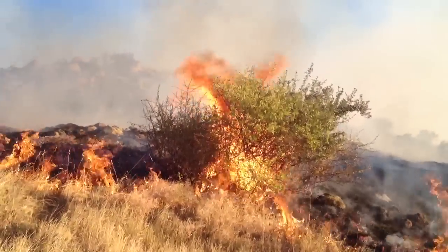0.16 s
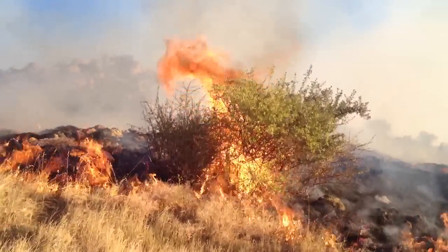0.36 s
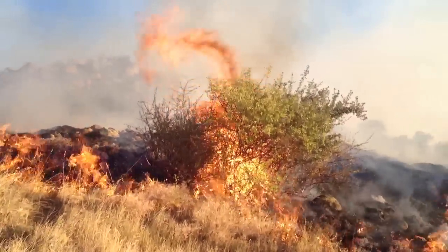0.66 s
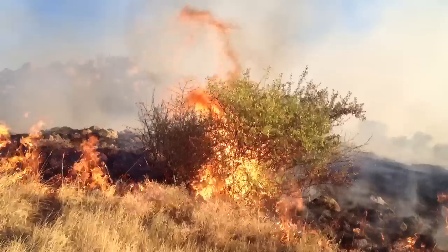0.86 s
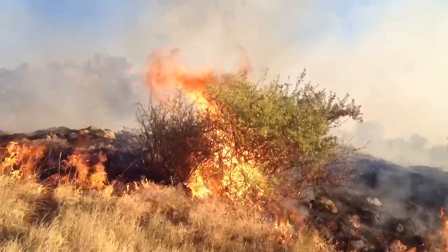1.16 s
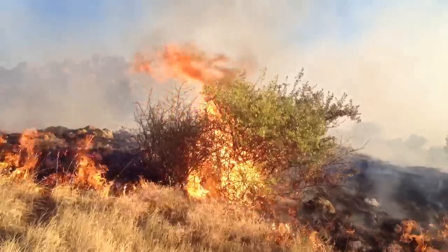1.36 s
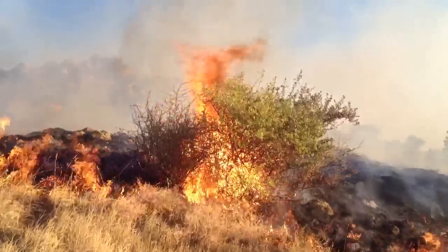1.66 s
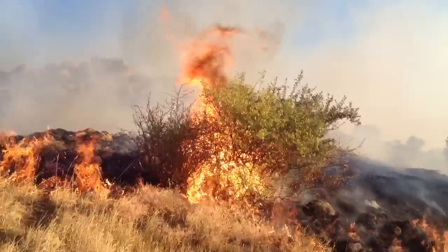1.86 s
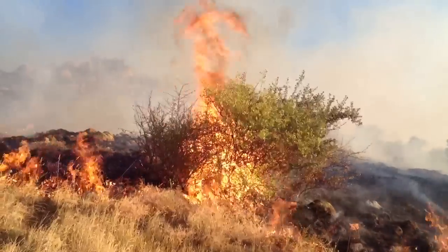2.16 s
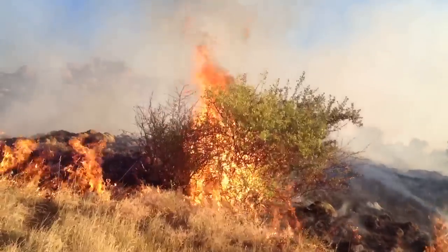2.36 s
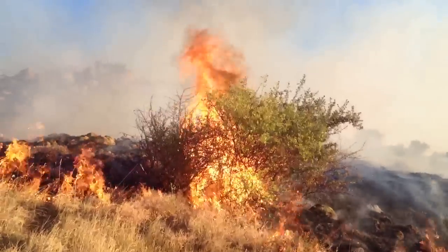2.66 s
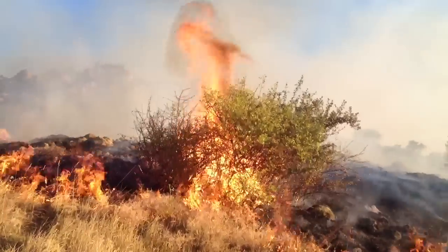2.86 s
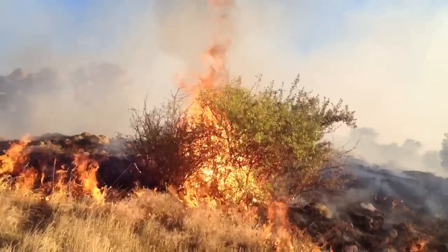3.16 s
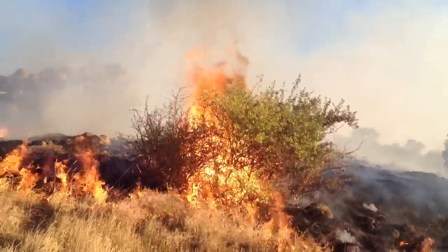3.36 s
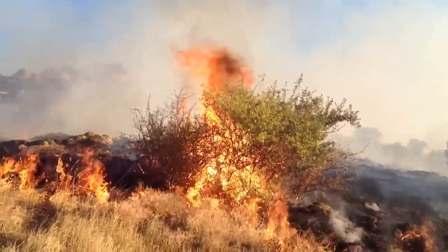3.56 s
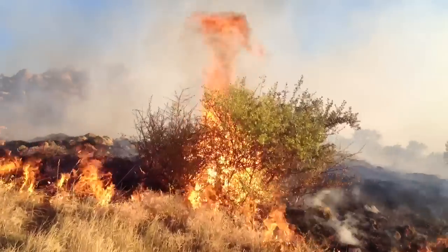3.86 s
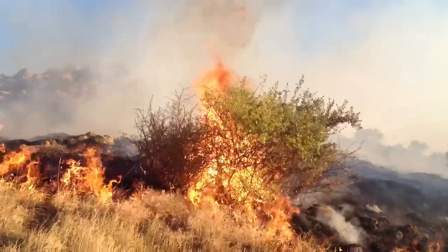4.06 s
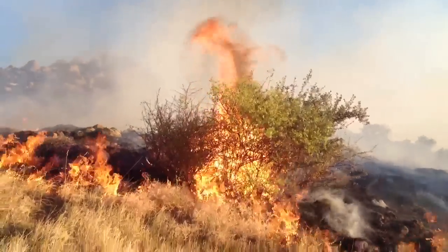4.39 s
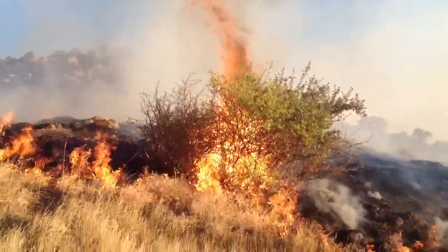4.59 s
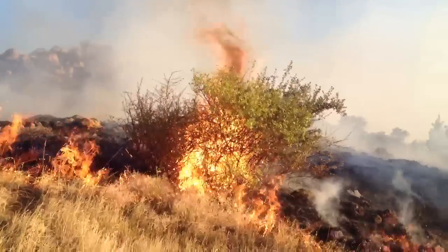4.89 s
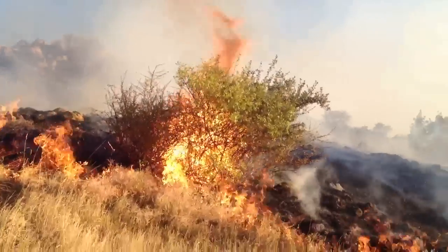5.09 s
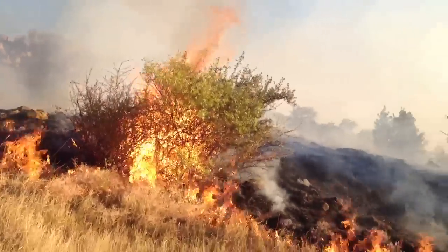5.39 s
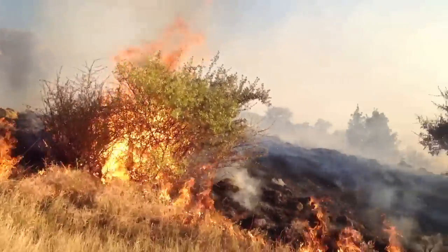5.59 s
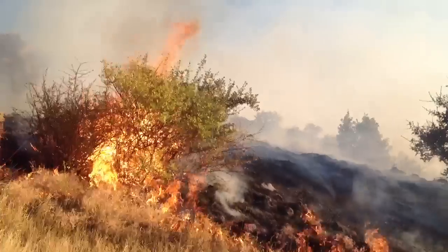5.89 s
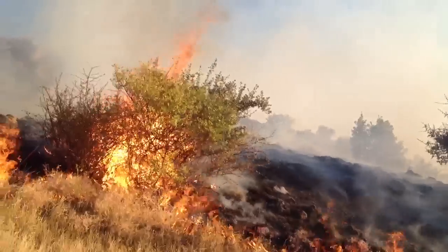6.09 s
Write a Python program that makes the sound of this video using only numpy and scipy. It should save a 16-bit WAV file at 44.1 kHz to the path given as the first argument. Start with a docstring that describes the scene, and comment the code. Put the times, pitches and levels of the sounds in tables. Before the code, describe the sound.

Dry grass and a shrub burn on an open hillside, heard from a hand-held phone some metres away. Dense, bright crackling and a steady hiss run throughout over a soft low rumble of flames. Twigs pop and snap irregularly, a few much louder than the rest. About two seconds in comes a soft low bump, like wind on the microphone. Near the end the crackle shifts slightly lower in tone.

```python
"""Grass fire on a dry hillside, burning through a shrub some metres from a hand-held phone.
Bursting stalks crackle densely, twigs snap, steam hisses and the turbulent flames rumble softly.
The ground doubles every click. The tone colour slides down as the phone turns near the end,
and its gain ducks after the loudest snaps."""
import sys
import numpy as np
from scipy import signal
from scipy.fft import rfft, irfft
from scipy.io import wavfile
from scipy.ndimage import uniform_filter1d

SR = 44100
rng = np.random.default_rng(int(sys.argv[2]) if len(sys.argv) > 2 else 0)


def file_out(sig):
    """Save sig as 16-bit WAV at sys.argv[1]."""
    # one column per channel
    cols = np.atleast_2d(sig).T
    # limit, then scale
    lim = np.clip(cols, -1, 1)
    pcm = np.round(lim * 32767).astype(np.int16)
    wavfile.write(sys.argv[1], SR, pcm)


N = 275184
TIME = np.arange(N) / SR
# two soft low thumps: t/s, f/Hz, width/Hz, peak/dB
LOW_THUMPS = [(2.082, 213, 97, -30), (2.099, 133, 80, -32)]


def crackle(grass_db, wood_db, flurry, rate_per_s=700, patches=10, size_db=5.5, range_db=19):
    """Stalks burst in patches: many tiny clicks, a few large, each with its own colour."""
    # click spectrum: f/Hz, width/Hz, relative level/dB, wood share/0-1
    click_bands = [(682, 500, -14.5, 0.85), (1700, 1690, -7, 0.7), (5280, 4100, -3.5, 0.4),
                   (8810, 4900, -1.5, 0), (13050, 5800, -2.5, .05)]
    layers = np.zeros((len(click_bands), N))
    for _ in range(patches):
        arrival = burst(fibre_db=4, fibre_s=.0008, scatter_db=-7.5, scatter_s=.0021)
        when, size = rng.random((int(rate_per_s * N / SR / patches), 2)).T
        at = (when * N).astype(int)
        # exponential in dB, wrapped into a thin stalk's range
        click_db = (-size_db * np.log(1 - size)) % range_db + .84 * flurry[at]
        for layer in layers:
            colour_db = 4.5 * rng.uniform(-1.57, 1, len(at))
            clicks = np.bincount(at, undb(click_db + colour_db), N)
            layer += signal.oaconvolve(clicks, arrival)[:N]
    return sum(unit(band(layer, hz, width)) * undb(db + grass_db + wood * (wood_db - grass_db))
               for layer, (hz, width, db, wood) in zip(layers, click_bands))


def snaps(thin_rows, knock_hz=480, knock_width_hz=560, ring_width_hz=300, ring_db=-11, size=1024):
    """Twigs burst: the cavity pops and rings, the stem knocks, splitting fibres crack."""
    # loudest twigs, levels as energy: t/s, pop f/Hz, pop/dB, knock/dB, crack f/Hz, crack/dB
    loud_rows = [(.126, 1510, -15, -28, 7700, -32), (.2853, 2040, -22.5, -28, 8210, -11),
                 (.3222, 2050, -15.5, -27, 6800, -5.5), (.43, 1960, -27, -45, 8830, -13.5),
                 (.4926, 2240, -15.5, -36, 7560, -9), (.6867, 1560, -13.5, -24, 8620, -30),
                 (.7889, 2260, -22, -37, 11120, -11), (.852, 1860, 0.5, -27, 9000, -2),
                 (1.1797, 1700, -9.5, -30, 8700, -10.5), (1.8852, 2100, -18, -32, 6900, -18),
                 (2.339, 1800, -17, -29, 8240, -9), (2.487, 2420, -17, -50, 8340, -12),
                 (2.6464, 1750, -11.5, -23, 5910, -10.5), (3.0748, 1690, -21.5, -38, 9800, -11),
                 (3.2445, 2400, -18.5, -49, 8150, -11.5), (3.3657, 2300, -16.5, -44, 8750, -11.5),
                 (3.4485, 1440, -15.5, -25, 6500, -14), (3.469, 2260, -16, -28, 9230, -14),
                 (3.5119, 1750, -12.5, -22, 6200, -6.5), (3.5726, 2060, -2, -17.5, 10300, -4.5),
                 (3.7082, 2110, -18, -26, 7670, -14.5), (3.7514, 2400, -33, -47, 9160, -9.5),
                 (3.8028, 2590, -21, -46, 9600, -5.5), (3.8385, 2720, -20, -44, 6300, -14),
                 (3.9553, 1660, -17, -26, 6520, -14.5), (3.9974, 2000, -27, -47, 9000, -10.5),
                 (4.128, 2030, -15.5, -30, 8920, -10), (4.6311, 2490, -14, -45, 8150, -16),
                 (4.6597, 2830, -17, -36, 6500, -10), (4.7445, 2110, -12.5, -29, 5380, -19),
                 (4.8903, 2090, -11, -38, 9600, -9), (4.9522, 2680, -16.5, -33, 7650, -10),
                 (4.9768, 1350, -3.5, -19, 5630, -4.5), (5.2294, 2220, -22, -34, 6600, -11.5),
                 (5.5248, 1750, -21, -27, 6900, -15), (5.7031, 2110, -10, -30, 8050, -10),
                 (5.7549, 2130, -19, -33, 10300, -10), (6.0461, 1840, -12, -31, 7600, -20.5),
                 (6.1326, 2930, -21, -46, 9800, -8.5)]
    out = np.zeros(N + size)
    for s, pop_hz, pop_db, knock_db, crack_hz, crack_db in loud_rows + thin_rows:
        # faint snaps lie deeper in the shrub: more scatter
        scatter_db = -6 - .25 * (max(pop_db, crack_db) + 12.5)
        push = burst(fibre_db=-14, fibre_s=.00037, scatter_db=scatter_db + 2.5, scatter_s=.0038)
        tear = burst(fibre_db=10, fibre_s=.0006, scatter_db=scatter_db, scatter_s=.003)
        parts = [(band(push, pop_hz, .92 * pop_hz), pop_db),
                 (band(push, pop_hz, ring_width_hz, order=1), pop_db + ring_db),
                 (-band(push, knock_hz, knock_width_hz), knock_db),  # stem recoil
                 (band(tear, crack_hz, .63 * crack_hz, order=1), crack_db)]
        i = int(s * SR)
        out[i:i + size] += sum(undb(db) * part / np.linalg.norm(part) for part, db in parts)
    return out[:N]


def thin_twigs(vigour_db, rate_per_s=7.5, pop_hz=2200, crack_hz=7800, spread_oct=.39, spread_db=2.5):
    """Rows for snaps(): thin twigs burst at random and in a volley just after the low thumps."""
    volley = rng.random((8, 5))
    steady = rng.random((int(rate_per_s * N / SR), 5))
    groups = [(volley, LOW_THUMPS[0][0] + .11, .18, -1), (steady, 0, N / SR, 0)]
    rows = []
    for draws, start_s, length_s, offset_db in groups:
        s = start_s + length_s * draws[:, 0]
        jitter = 2 * draws[:, 1:].T - 1
        pop_ratio, crack_ratio = 2 ** (spread_oct * jitter[:2])
        pop_gain_db, crack_gain_db = offset_db + np.interp(s, TIME, vigour_db) + spread_db * jitter[2:]
        rows += zip(s, pop_hz * pop_ratio, pop_gain_db - 22.5, pop_gain_db - 43.5,
                    crack_hz * crack_ratio, crack_gain_db - 15.5)
    return rows


def hiss(grass_db, wood_db, flurry, flicker_db=1.24):
    """Steam jets and far crackle sputter together; each band also flickers alone."""
    # hiss spectrum: f/Hz, width/Hz, relative level/dB, wood share/0-1
    steam_bands = [(568, 377, -12, 0.5), (1030, 600, -14, 1), (2000, 1830, -5.5, 1), (3980, 3700, -9, 0.2),
                   (7640, 4750, -3, 0.1), (12700, 7200, -1, 0)]
    sputter_db = .9 * flurry + 2.5 * walk(220)
    return sum(unit(band(rng.standard_normal(N), hz, width))
               * undb(db + grass_db + wood * (wood_db - grass_db) + sputter_db + flicker_db * walk(40))
               for hz, width, db, wood in steam_bands)


def flames(rumble_db, flutter_db=.5):
    """Turbulent burning: a low, fluttering rumble."""
    # rumble spectrum: f/Hz, relative density/dB
    rumble_spectrum = [(20, -33), (50, -27.5), (75, -18), (110, -5.5), (170, 1.5), (240, -4), (330, -7.5),
                       (480, -16.5), (900, -20.5), (3000, -43)]
    hz, db = np.transpose(rumble_spectrum)
    bin_hz = np.arange(N // 2 + 1) * SR / N
    colour = undb(np.interp(np.log(bin_hz + 1), np.log(hz), db))
    rumble = unit(irfft(rfft(rng.standard_normal(N)) * colour, N))
    return rumble * undb(rumble_db + flutter_db * walk(8.1))


def low_thumps(puff_db=-44, rise_s=.0059, decay_s=.13):
    """Two soft low thumps and a dying puff, like wind buffeting the phone."""
    out = np.zeros(N)
    for s, thump_hz, width_hz, peak_db in LOW_THUMPS:
        thump = band(signal.unit_impulse(SR // 10), thump_hz, width_hz)
        i = int(s * SR)
        out[i:i + len(thump)] += undb(peak_db) * thump / np.abs(thump).max()
    age_s = np.maximum(TIME - LOW_THUMPS[-1][0], 0)
    envelope = (1 - np.exp(-age_s / rise_s)) * np.exp(-age_s / decay_s)
    puff = unit(band(rng.standard_normal(N), hz=140, width_hz=130, order=3))
    return out + undb(puff_db) * envelope * puff


def burst(fibre_db, fibre_s, scatter_db, scatter_s, ground_s=.00175, ground_db=-10.5, size=1024):
    """One burst at unit energy: click, tearing fibres, ground echo, scatter off the brush."""
    t = np.arange(size) / SR
    fibres, brush = (rng.standard_normal(size) * np.exp(-t / s) for s in (fibre_s, scatter_s))
    direct = (t == 0) + undb(fibre_db) * fibres / np.linalg.norm(fibres)
    direct /= np.linalg.norm(direct)
    lag = int(SR * ground_s * rng.uniform(.85, 1.15))
    echo = undb(ground_db) * np.roll(direct, lag)
    arrival = direct + echo + undb(scatter_db) * brush / np.linalg.norm(brush)
    return arrival / np.linalg.norm(arrival)


def tone_colour(x, size=1024):
    """Peaks and dips from ground reflection and the turning phone glide from pose to pose."""
    # tone colour per pose: f/Hz, width/Hz, gain/dB
    facing = [(670, 250, 3.5), (906, 96, -4), (1100, 330, 2.5), (1750, 610, 3.5), (2270, 360, 6.5),
              (3150, 3000, -2), (4600, 990, 3), (4770, 270, 0.5), (8180, 1930, 9.5), (11840, 2270, 6)]
    tilted = [(670, 300, 5.5), (910, 75, -4.5), (1130, 260, 4), (1750, 870, 1.5), (2400, 360, 6.5),
              (3060, 1100, 0), (4530, 700, 7.5), (6000, 1600, -0.5), (8250, 1970, 11), (12100, 2800, 5)]
    swinging = [(630, 300, 5), (900, 140, 0), (1160, 420, -0.5), (1600, 530, -3), (2200, 380, 4),
                (2880, 720, -6.5), (4370, 790, 5.5), (5200, 760, -1), (7170, 2500, 12), (12600, 2200, 5)]
    turned = [(610, 420, 8), (880, 120, -4.5), (1090, 390, 4.5), (1510, 490, -2), (1970, 660, 1.5),
              (2300, 810, -2), (4400, 2820, 7), (5230, 670, -1), (7580, 3270, 9), (11900, 1600, 4)]
    poses = np.array([facing, tilted, tilted, swinging, turned])
    # time of each pose: t/s
    pose_times_s = [3.25, 3.7, 4.62, 4.83, 5.05]
    out = np.zeros(N + 2 * size)
    for i in range(0, N, size):
        shares = [np.interp((i + size / 2) / SR, pose_times_s, row) for row in np.eye(len(poses))]
        piece = signal.fftconvolve(x[i:i + size], bell_filter(np.tensordot(shares, poses, 1)))
        out[i:i + len(piece)] += piece
    return out[:N]


def bell_filter(peaks, size=1024):
    """Minimum-phase impulse response; gain in dB is a sum of bell curves."""
    hz = np.arange(size // 2 + 1) * SR / size
    db = sum(peak_db * .5 ** ((2 * (hz - peak_hz) / width) ** 2) for peak_hz, width, peak_db in peaks)
    cepstrum = irfft(np.log(undb(db)))[:size // 2]
    cepstrum[1:] *= 2
    return irfft(np.exp(rfft(cepstrum, size)))


def band(x, hz, width_hz, order=2):
    """Band-pass, geometric centre hz."""
    low_hz = np.hypot(hz, width_hz / 2) - width_hz / 2
    edges_hz = [low_hz, min(low_hz + width_hz, .48 * SR)]
    return signal.sosfilt(signal.butter(order, edges_hz, "band", fs=SR, output="sos"), x)


def walk(rate_hz):
    """Slewed random steps, rms 1."""
    hold = int(SR / rate_hz)
    steps = np.repeat(rng.standard_normal(N // hold + 1), hold)
    return unit(uniform_filter1d(steps, hold)[:N])


def undb(db):
    """dB to gain."""
    return 10 ** (np.asarray(db) / 20)


def unit(x):
    """Scale to rms 1."""
    return x / np.sqrt(np.mean(x ** 2))


def scene(crackle_db=-5, hiss_db=-8, snap_db=-.87, wood_lift_db=9, rumble_lift_db=2):
    """Crackle, hiss and snaps in shifting tone colour, over rumble and thumps."""
    # burn intensity before mix gains: t/s, grass/dB, wood/dB, rumble/dB
    burn = [(0, -39, -47, -55), (.7, -41, -49.5, -52.5), (1, -42, -52.5, -57), (1.35, -46, -49, -55.5),
            (1.95, -41, -51.5, -55), (2.3, -39, -48.5, -54.5), (2.55, -43.5, -50.5, -51.5),
            (2.9, -43, -49, -54.5), (3.25, -41, -49.5, -54), (3.77, -42, -51, -54), (4.57, -42, -48, -53.5),
            (4.88, -42.5, -48.5, -51.5), (5.18, -42, -48.5, -53), (5.63, -41, -50, -52),
            (6, -43.5, -52.5, -53), (6.24, -41, -52.5, -52.5)]
    s, *levels = np.transpose(burn)
    grass_db, wood_db, rumble_db = (np.interp(TIME, s, db) for db in levels)
    wood_db += wood_lift_db
    flurry = walk(45)  # tufts ignite in turn
    fire = undb(crackle_db) * crackle(grass_db, wood_db, flurry)
    fire += undb(hiss_db) * hiss(grass_db, wood_db, flurry)
    fire += undb(snap_db) * snaps(thin_twigs(grass_db - grass_db.mean()))
    return (tone_colour(fire) + flames(rumble_db + rumble_lift_db) + low_thumps())[None]


def record(dry, threshold_db=-21.5, attack_s=.0056, recovery_db_per_s=6, cutoff_hz=15300):
    """Phone gain control: ducks just after the loudest snaps, creeps back; then a low-pass."""
    lag = int(attack_s * SR)
    power = np.abs(uniform_filter1d(dry[0] ** 2, lag)) + 1e-12
    over_db = np.maximum(10 * np.log10(power) - threshold_db, 0)
    recovery_db = recovery_db_per_s * TIME
    duck_db = np.maximum.accumulate(over_db + recovery_db) - recovery_db
    ducked = dry * undb(-np.pad(duck_db, (lag, 0))[:N])
    return signal.sosfilt(signal.ellip(10, .2, 70, cutoff_hz, fs=SR, output="sos"), ducked)


dry = scene()
out = record(dry)
file_out(out)
```